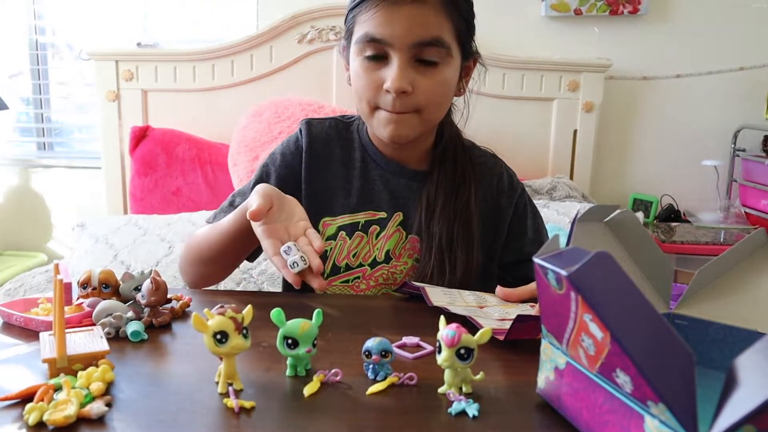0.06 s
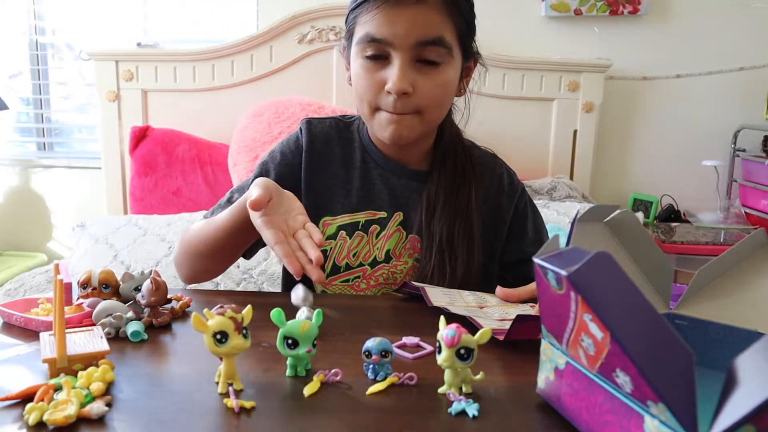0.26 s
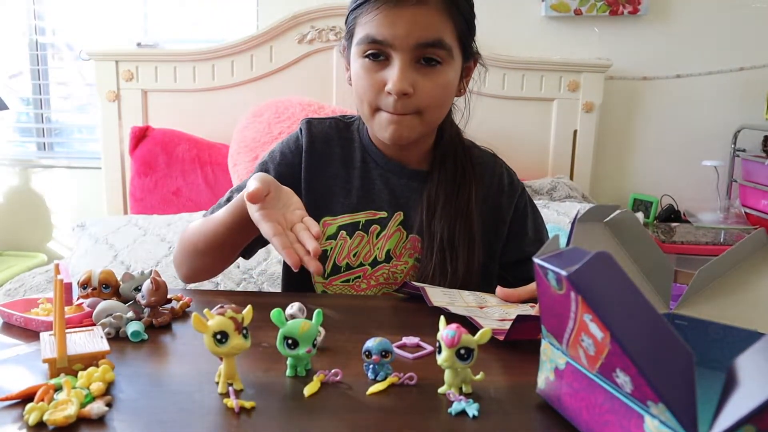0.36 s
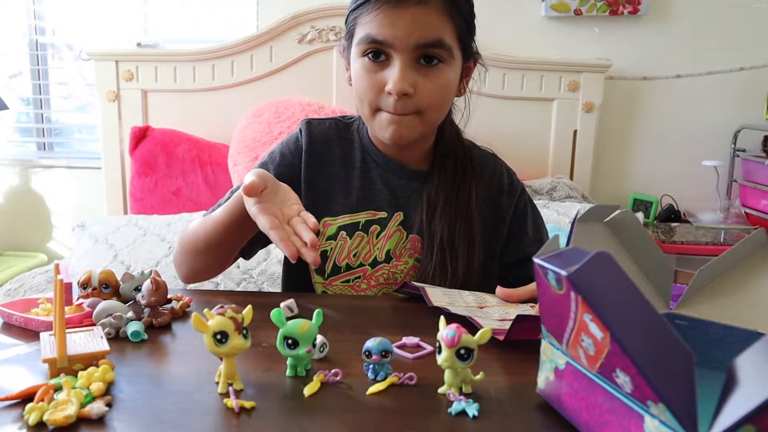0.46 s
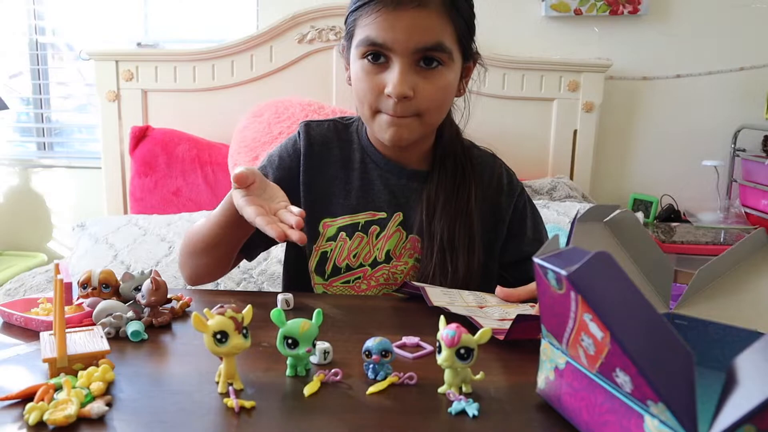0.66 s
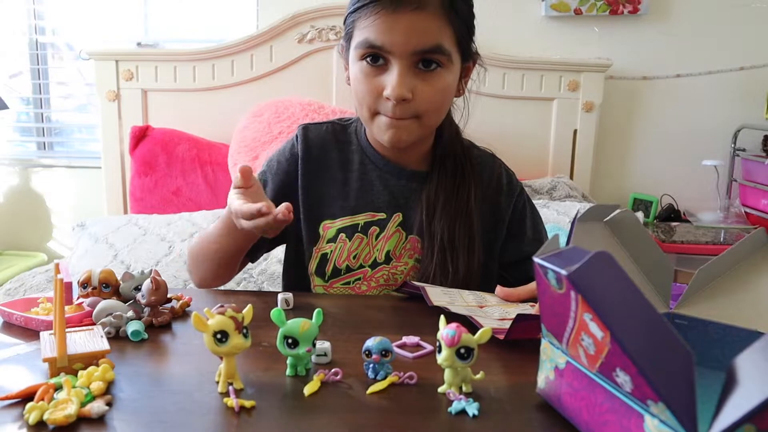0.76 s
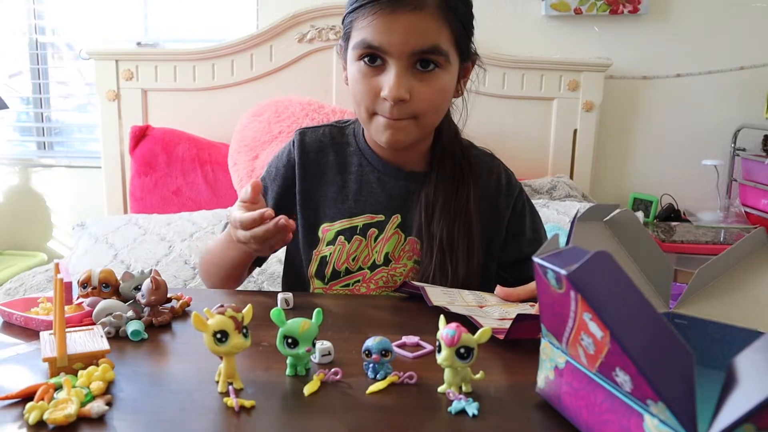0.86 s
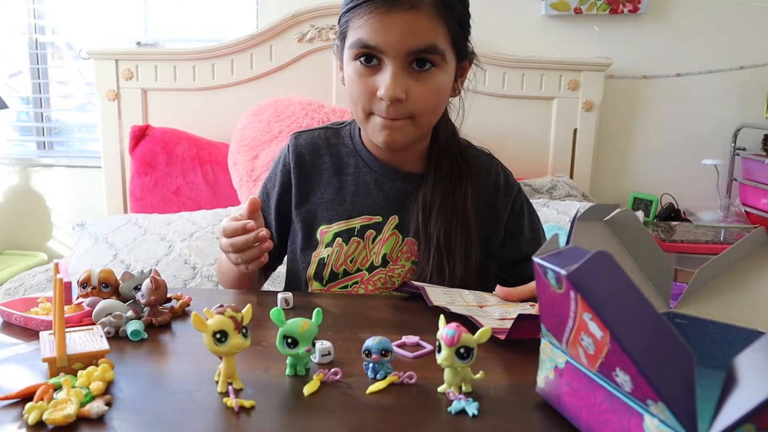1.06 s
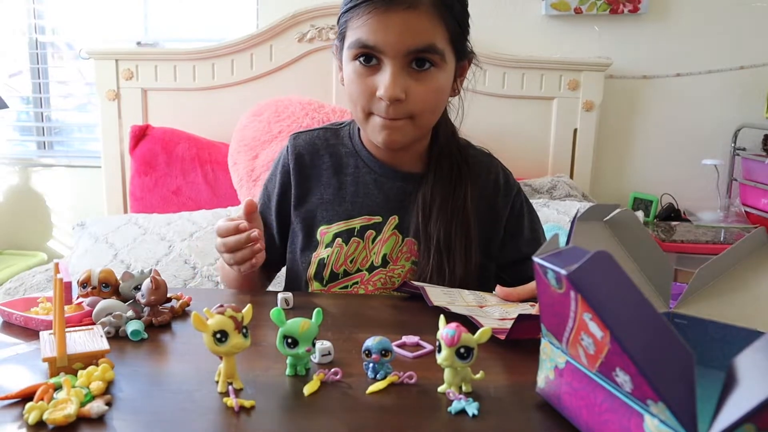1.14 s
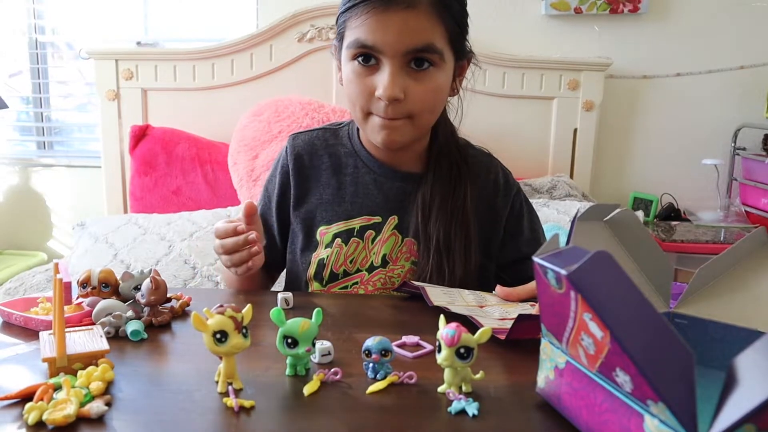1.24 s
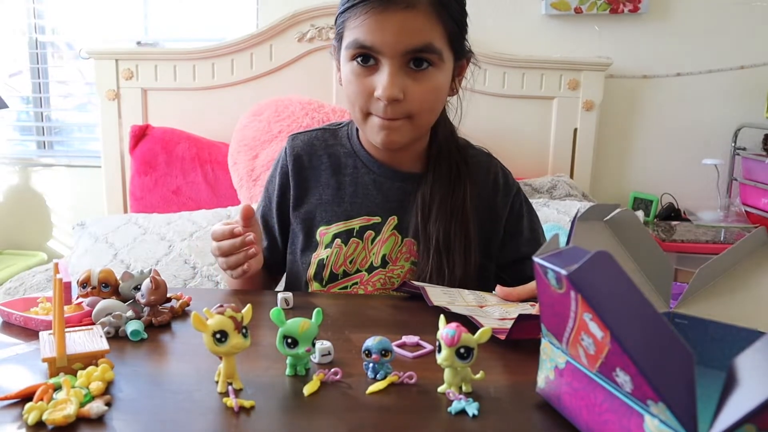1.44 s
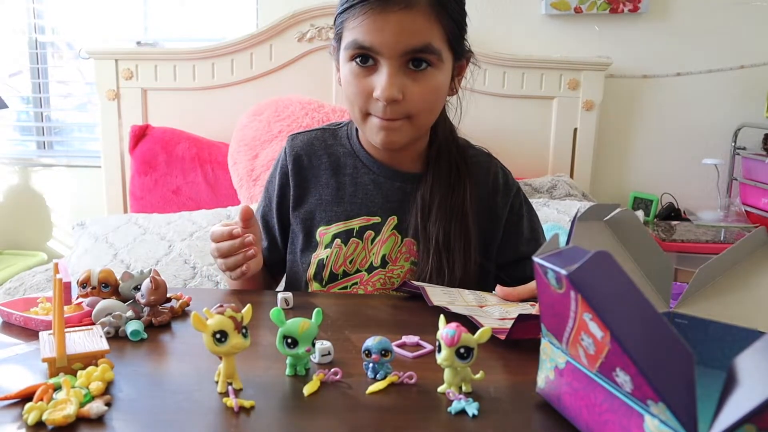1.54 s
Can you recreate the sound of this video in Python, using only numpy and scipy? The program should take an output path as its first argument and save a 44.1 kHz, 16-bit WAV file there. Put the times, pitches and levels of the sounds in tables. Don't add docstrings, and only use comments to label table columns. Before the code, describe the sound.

Dice clatter on bare wood in quickening hops, followed by duller knocks and a rattle on thin card, then a few faint plastic ticks and soft hand thumps, close up in a quiet furnished room.

```python
import sys
import numpy as np
from scipy import signal
from scipy.fft import rfft, irfft, next_fast_len
from scipy.io import wavfile
from scipy.ndimage import uniform_filter1d

SR = 44100
rng = np.random.default_rng(int(sys.argv[2]) if len(sys.argv) > 2 else 0)


def master_out(mix):
    frames = np.transpose(np.atleast_2d(mix))
    ceiling = np.clip(frames, -1, 1)
    pcm = np.round(ceiling * 32767).astype(np.int16)
    wavfile.write(sys.argv[1], SR, pcm)


def volts_from_db(level):
    exponent = np.asarray(level, float) / 20
    return 10 ** exponent


N = 70560
T = np.arange(4096) / SR
CLOCK = np.arange(N) / SR


def unit(x):
    return x / np.sqrt(np.mean(x ** 2) + 1e-20)


def along(points, hz):
    f, value = np.transpose(points)
    return np.interp(np.log(hz + 1), np.log(f + 1), value)


def filtered(x, response):
    size = next_fast_len(N + SR // 2)
    hz = np.fft.rfftfreq(size, 1 / SR)
    return irfft(rfft(x, size) * response(hz), size)[..., :N]


def low_cut(hz, corner_hz):
    return (1j * hz / (corner_hz + 1j * hz)) ** 2


def add(track, s, x):
    track[round(s * SR):][:len(x)] += x


def ring(modes, varied=True, rise_ms=.12):
    total = np.zeros(len(T))
    for hz, width_hz, db in modes:
        strike_db = db + varied * 2.5 * rng.normal()
        total += volts_from_db(strike_db) * np.exp(-np.pi * width_hz * T) * np.sin(2 * np.pi * hz * T)
    soft_start = 1 - np.exp(-(T * 1000 / rise_ms) ** 2)
    return total * soft_start / np.sqrt(len(modes))


def contact(ms):
    length = int(np.clip(2 * ms / 1000 * SR, 16, 2048))
    u = T[:length] / (ms / 1000)
    swell = np.exp(-2 * (u - 1) ** 2)
    spectrum = rfft(swell * rng.standard_normal(length))
    rough = swell * irfft(spectrum / abs(spectrum), length)
    return rough / np.linalg.norm(rough)


# start in seconds, peak level in dB, click pitch in Hz, edge brightness in dB, table thud in dB.
HOPS = [(0.243, 7.5, 2106, 0, -25), (0.282, -29, 2000, -25, -34), (0.3078, -15, 2300, 5.5, -15.5),
        (0.3117, 6.5, 1940, 1, -30), (0.3194, -17.5, 2350, 12.5, -28.5), (0.3219, 6.5, 2247, -7, -22),
        (.376, -2.5, 2280, -1.5, -22), (.4104, -2, 2377, -13, -29), (.4282, -7, 2380, -27.5, -27),
        (0.445, -6.5, 2380, -8, -38), (0.4558, -14.5, 2320, -25.5, -8), (0.4596, -14, 2400, -22, -45),
        (.4675, -18.5, 2040, -19, -53), (0.4702, -18, 2340, -12.5, -46), (.4745, -17.5, 2420, -25, -52)]
# pitch in Hz, width in Hz, level in dB.
DIE_EDGE = [(5820, 1190, -0.5), (8090, 1930, 3.5), (10350, 2220, 5.5), (13280, 1100, -6.5)]
# pitch in Hz, width in Hz, level in dB.
TABLE_TOP = [(105, 25, -10.5), (313, 36, -5.5), (424, 108, 8.5), (656, 20, -33.5), (1040, 250, -27.5),
             (1600, 600, -17.5)]


def die_on_wood():
    sharpness, upper_ratio = 1.93, 1.5285
    out = np.zeros(N + SR)
    for s, db, hz, edge_db, thud_db in HOPS:
        width_hz = hz / sharpness
        upper_db = -3.5 + .5 * db
        click = ring([(hz, width_hz, 0), (upper_ratio * hz, width_hz, upper_db)], False, rise_ms=.6)
        edge = volts_from_db(edge_db + 11) * ring(DIE_EDGE)
        thud = volts_from_db(thud_db) * ring(TABLE_TOP)
        add(out, s, volts_from_db(db + .15) * (click / abs(click).max() + edge + thud))
    return out[:N]


# time in seconds, nearness to the rim from 0 to 1.
PATH = [(.36, 0.7), (.5, 0.06), (.72, 0.52), (.76, 0.63)]


def rim_nearness(s):
    return np.clip(np.interp(s, *np.transpose(PATH)), 0, 1)


# start in seconds, level in dB, brightness in dB, contact length in ms, low knock in dB.
TUMBLES = [(0.3478, -15.5, 11, 0.79, 0), (0.3492, -19, -12, 2.3, 12.5), (0.3508, -21, -4, 1.4, -6),
           (0.5353, -12.5, -18.5, 1.52, 1), (0.5384, -7, 14, 0.95, -10.5), (0.5408, -19.5, 8.5, 0.56, -5),
           (.5412, -16.5, -23.5, 1.37, -2.5), (0.5806, -33, -15, 1.2, 15), (0.5866, -19, 2, 0.78, 1),
           (0.592, -44, -10, 1.7, 7), (.6, -8, 7, 0.71, -3), (0.6008, -15.5, 12, 0.79, 4.5),
           (0.6274, -19.5, -2, 1.6, -0.5), (0.6303, -14, 16.5, 1.17, 0), (0.6491, -21, -12, 1.9, -3),
           (0.6518, -20, -19, 0.73, -4), (.6762, -16.5, 23.5, 0.91, -2), (.6775, -14.5, -1, 1.7, -8.5),
           (0.691, -32.5, -6, 2.26, 11.5), (0.708, -34, -10, 2.4, 8), (0.747, -38, 1, 3.06, 17),
           (0.7673, -26.5, -3, 1.7, 3), (0.777, -30, -6, 2.1, 10), (0.7925, -21, 2.5, 0.71, -1),
           (0.806, -31.5, -15, 1.9, 13.5), (.808, -29, -3, 1.5, 8), (0.8131, -18, 6, 1.3, -7),
           (0.8269, -22.5, -8, 0.95, 4), (0.833, -26.5, -10, 0.75, 6), (0.8437, -21.5, 1.5, 0.93, 2),
           (0.8473, -19.5, 1, 1.08, -7), (0.8548, -32.5, -10, 0.86, 10)]
# pitch in Hz, width in Hz, level in dB.
CARD_MIDDLE = [(666, 57, -2), (1044, 115, 3.5), (1329, 360, 3.5), (1665, 420, 5.5)]
# pitch in Hz, width in Hz, level in dB.
CARD_RIM = [(700, 230, -15.5), (1016, 165, -5.5), (1270, 230, 0), (1599, 210, 6.5)]
# pitch in Hz, width in Hz, level in dB.
CARD_TOP = [(2764, 585, 12.5), (3177, 565, 8), (3670, 710, 13.5), (4360, 666, 6.5), (5180, 2540, 20)]


def card_knocks():
    knocks, thuds = np.zeros(N + SR), np.zeros(N + SR)
    for s, db, bright_db, ms, low_db in TUMBLES:
        rim = rim_nearness(s)
        low_modes = (1 - rim) * np.array(CARD_MIDDLE) + rim * np.array(CARD_RIM)
        body = volts_from_db(low_db) * ring(low_modes) + ring(CARD_TOP) + volts_from_db(bright_db) * ring(DIE_EDGE)
        add(knocks, s, volts_from_db(db - 1) * signal.fftconvolve(contact(ms), body))
        add(thuds, s + ms / 1000, volts_from_db(db - 32.5) * ring(TABLE_TOP[:3]))
    return knocks[:N], thuds[:N]


# time in seconds, level in dB.
ROLL = [
    (0.477, -22),
    (0.51, -41),
    (.581, -31.5),
    (.698, -29.5),
    (0.737, -40),
    (.76, -36),
    (.80, -38.5),
    (0.856, -33.5),
    (.869, -67),
]


def card_rattle():
    rate_hz, spread_db = 2500, 1
    strikes = rng.random(N) < rate_hz / SR
    grains = strikes * rng.standard_normal(N) * volts_from_db(spread_db * rng.exponential(size=N))
    rim = rim_nearness(CLOCK)
    top = volts_from_db(-2.5) * ring(CARD_TOP, False)
    middle_rattle = signal.fftconvolve(grains * (1 - rim), ring(CARD_MIDDLE, False) + top)
    rim_rattle = signal.fftconvolve(grains * rim, ring(CARD_RIM, False) + top)
    rattle = unit((middle_rattle + rim_rattle)[:N])
    s, db = np.transpose(ROLL)
    return rattle * volts_from_db(np.interp(CLOCK, s, db, -120, -120))


def die_on_card():
    knocks, thuds = card_knocks()
    return thuds + filtered(knocks + card_rattle(), lambda hz: low_cut(hz, 796))


# start in seconds, level in dB, contact length in ms, pitch in Hz.
TICKS = [
    (0.0378, -26.5, 1.35, 6470),
    (0.101, -35, 2.3, 5700),
    (0.7468, -16, 0.51, 10700),
    (.953, -33.5, 1.5, 5500),
    (.972, -20.5, 4.4, 11000),
    (1.005, -17.5, 2.9, 10060),
    (1.245, -33, 1.5, 10500),
]
# ratio to its pitch, width over its pitch, level in dB.
TICK_MODES = [(.75, .25, 2.5), (1, 0.18, 7.5), (1.199, 0.12, 3.5)]
# start in seconds, level in dB, contact length in ms.
THUMPS = [
    (1.336, -42.5, 5.7),
    (1.445, -44, 7.9),
]
# pitch in Hz, width in Hz, level in dB.
PALM = [(252, 330, -4), (587, 400, 11)]


def small_things():
    out = np.zeros(N + SR)
    for s, db, ms, hz in TICKS:
        modes = [(hz * ratio, hz * width, level_db) for ratio, width, level_db in TICK_MODES]
        add(out, s, volts_from_db(db) * signal.fftconvolve(contact(ms), ring(modes)))
    for s, db, ms in THUMPS:
        add(out, s, volts_from_db(db) * signal.fftconvolve(contact(ms), ring(PALM)))
    return out[:N]


# frequency in Hz, time to fall by 60 dB in seconds.
DECAY = [(200, .25), (600, .2), (1500, .25), (3700, .26), (9700, .18)]
# frequency in Hz, level in dB.
ROOM_MID = [(200, -3), (1000, -4), (3000, -13), (7000, -12.5), (13000, -29)]
# frequency in Hz, level in dB.
ROOM_SIDE = [(200, -35.5), (1000, -9.5), (3000, -10.5), (7000, -6.5), (13000, -21)]


def room(x):
    gap_s, stretch = .0018, 2205
    out = np.zeros((2, N + SR))
    for k in range(0, N, stretch):
        hz, t, z = signal.stft(rng.standard_normal((2, SR // 2)), SR, nperseg=256)
        decay_s = np.clip(along(DECAY, hz), .03, 1)[:, None]
        tail = signal.istft(z * volts_from_db(-60 * t / decay_s), SR, nperseg=256)[1]
        tail = tail * np.clip(np.arange(tail.shape[1]) / SR / gap_s - 1, 0, 1)
        wet = signal.fftconvolve(x[None, k:k + stretch], tail / np.linalg.norm(tail[0]), axes=1)
        out[:, k:k + wet.shape[1]] += wet[:, :N + SR - k]
    mid, side = filtered(out[:, :N], lambda hz: volts_from_db([along(ROOM_MID, hz), along(ROOM_SIDE, hz)]))
    return np.array([mid + side, mid - side])


def patchy(spectrum):
    z = signal.stft(rng.standard_normal(N), nperseg=512)[2]
    field = uniform_filter1d(rng.standard_normal(z.shape), 6, 0)
    field = uniform_filter1d(field, 10, 1)
    noise = signal.istft(z * volts_from_db(-unit(field)), nperseg=512)[1][:N]
    return unit(filtered(noise, lambda hz: volts_from_db(along(spectrum, hz))))


# frequency in Hz, level in dB per Hz.
HUM = [(12, -30), (20, -6.5), (158, -1.5), (193, -4), (228, -4), (357, -6), (923, -9.5), (11400, -31.5),
       (16000, -58)]
# frequency in Hz, level in dB per Hz.
HISS = [(12, -65), (20, -44.5), (65, -26.5), (193, -9), (472, -8), (849, -10.5), (4060, -19), (10500, -34),
        (16000, -43)]


def air_and_hiss():
    mid = volts_from_db(-55) * patchy(HUM)
    side = volts_from_db(-52) * patchy(HISS)
    return np.array([mid + side, mid - side])


# delay in seconds, level in dB.
NEAR = [(.0013, -18), (.0036, -20), (.0082, -24), (.0145, -22)]
# frequency in Hz, lead in radians.
LEAD = [(300, .3), (1400, .7), (2800, 1.6), (5500, 2.2), (9000, 2.1), (14000, 2.4)]


def scene():
    dry = die_on_wood() + die_on_card() + small_things()
    dry = filtered(dry, lambda hz: low_cut(hz, 110) / (1 + 1j * hz / 12500) ** 2)

    def to_ports(hz):
        echoes = sum(volts_from_db(db) * np.exp(-2j * np.pi * hz * s) for s, db in NEAR)
        return (1 + echoes) * np.exp(.5j * along(LEAD, hz) * np.array([[1], [-1]]))

    return filtered(dry, to_ports) + room(dry) + air_and_hiss()


def band_limit(x):
    return signal.sosfilt(signal.butter(12, 16340, fs=SR, output="sos"), x)


def record(dry):
    threshold, dip_db, recover_s, react_s = .6, 5, .03, .002
    over = np.clip(abs(dry).max(0) - threshold, 0, None)
    after = np.arange(SR // 2) / SR - react_s
    load = signal.fftconvolve(over, (after > 0) * np.exp(-after / recover_s))[:N]
    mix = dry * volts_from_db(-dip_db * load / load.max())
    mix = mix / (1 + abs(mix) ** 8) ** (1 / 8)
    return band_limit(mix)


dry = scene()
out = record(dry)
master_out(out)
```